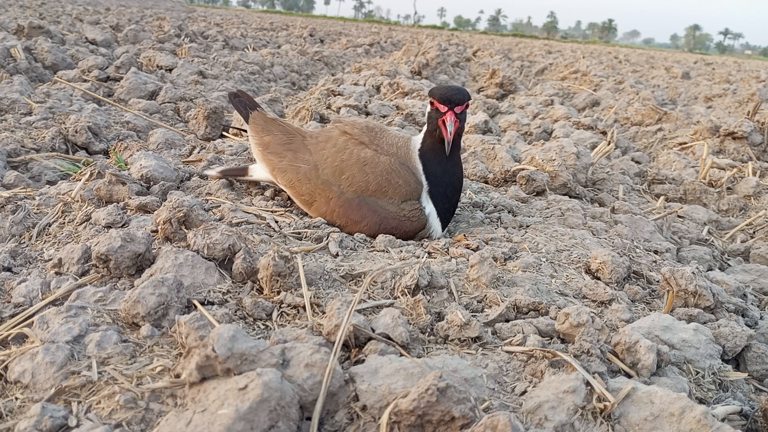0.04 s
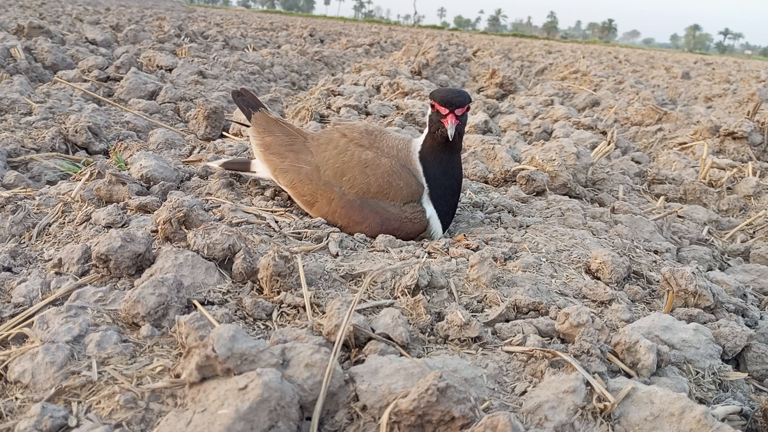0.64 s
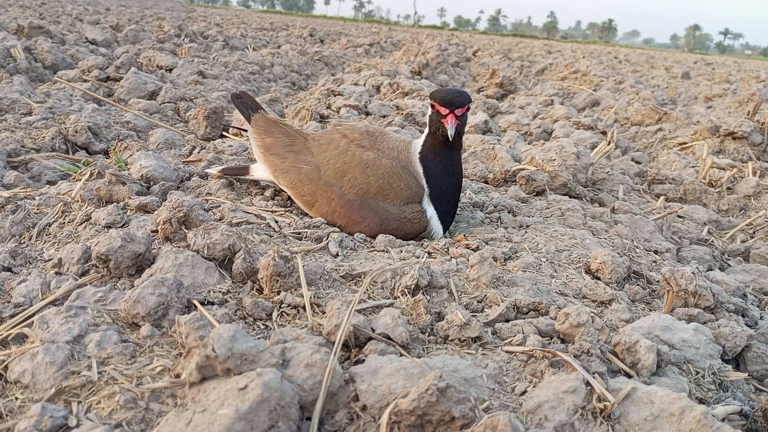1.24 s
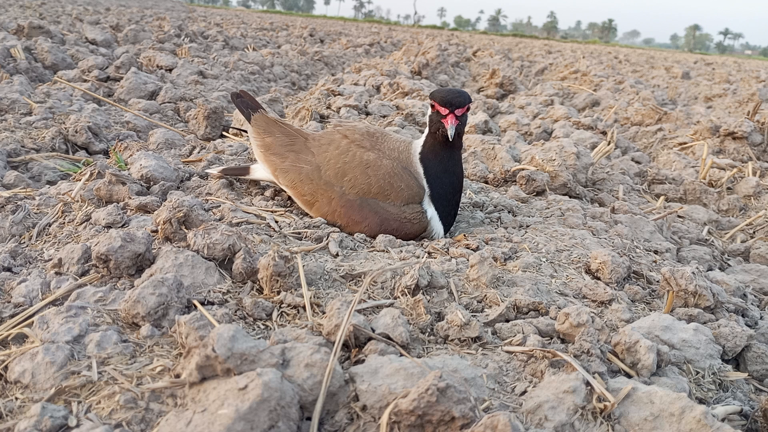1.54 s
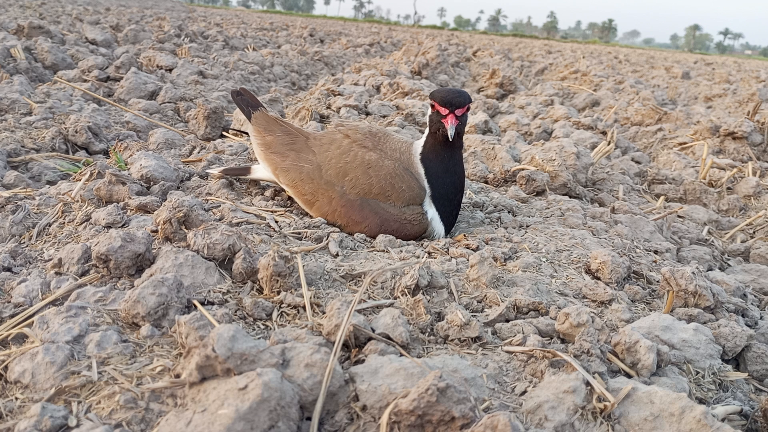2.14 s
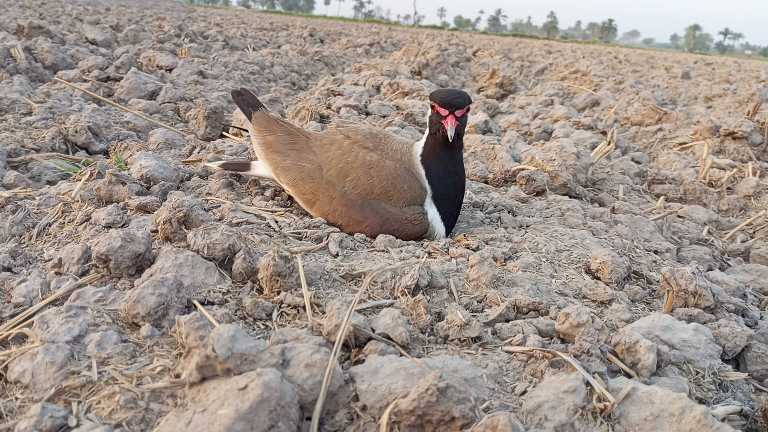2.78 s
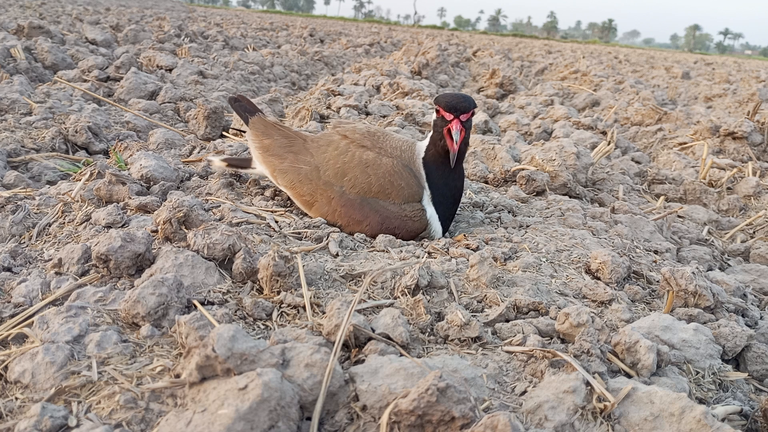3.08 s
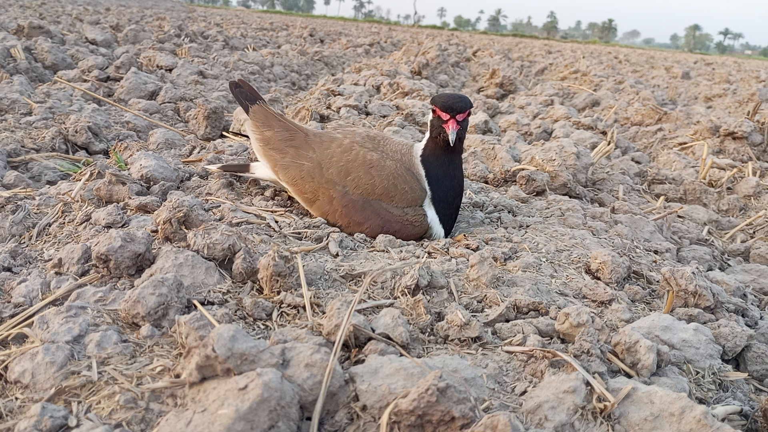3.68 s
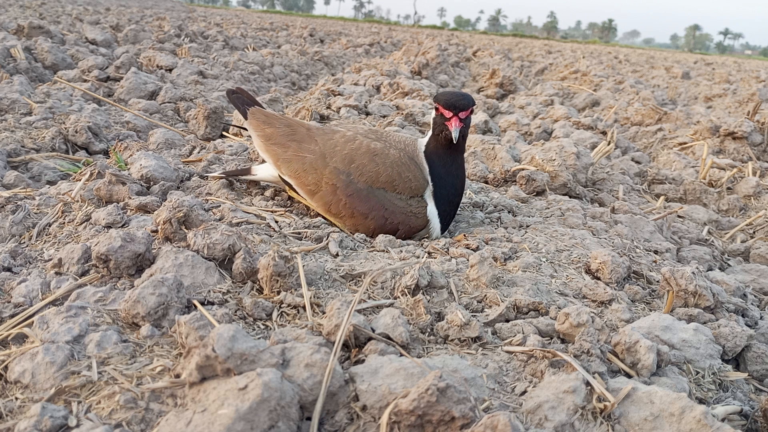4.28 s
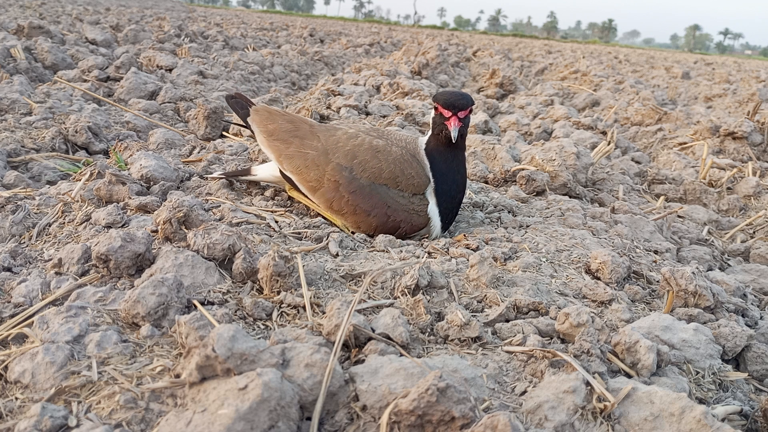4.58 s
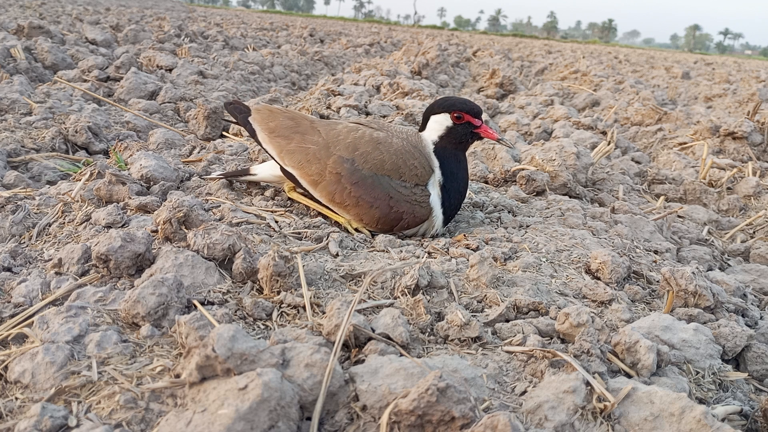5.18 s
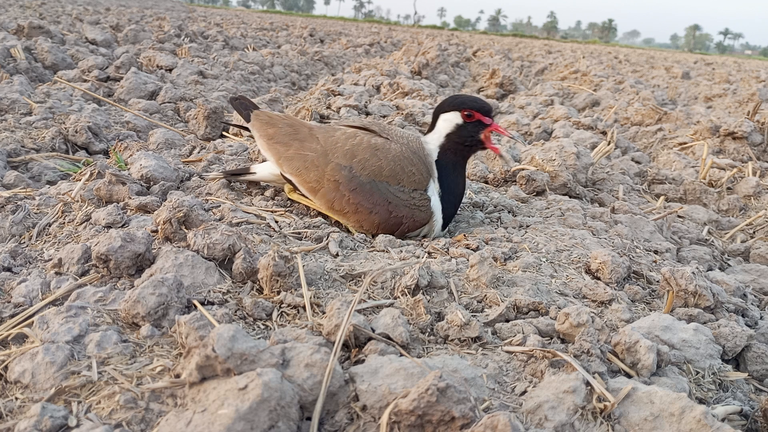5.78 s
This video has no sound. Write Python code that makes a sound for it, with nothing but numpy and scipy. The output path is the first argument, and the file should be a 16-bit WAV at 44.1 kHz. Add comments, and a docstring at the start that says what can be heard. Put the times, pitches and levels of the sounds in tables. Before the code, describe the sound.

A lapwing gives three quick rattling notes, then three sharp, loud calls, over faint wind and distant twittering birds.

```python
"""In a ploughed field, a lapwing on its nest gives three rattling notes, then three sharp calls.
Its voice is a pair of buzzing membranes, shaped by throat and bill. A valve chops it into rattles;
in each sharp call it flutters, breaks up and leaps higher. Small birds twitter far off over
light wind. An automatic gain control turns the whole field down at each loud call."""
import sys
import numpy as np
from scipy import signal
from scipy.fft import rfft, irfft
from scipy.io import wavfile
from scipy.ndimage import uniform_filter1d, minimum_filter1d

SR = 44100
rng = np.random.default_rng(int(sys.argv[2]) if len(sys.argv) > 2 else 0)


def materialize(psi):
    """Save the field psi as 16-bit PCM at rate SR to the path in sys.argv[1].

    A 1-D psi becomes a single channel; in a 2-D psi each row is a channel.
    """
    bounded = np.clip(np.atleast_2d(psi).T, -1, 1)
    quanta = np.round(bounded * 32767).astype(np.int16)
    wavfile.write(sys.argv[1], SR, quanta)


N = 261494
TIME = np.arange(N) / SR


def from_db(db):
    """Turn decibels into a gain."""
    return 10 ** (np.asarray(db) / 20)


def rms_one(x):
    """Scale a signal to an average power of 1."""
    return x / np.sqrt(np.mean(x ** 2) + 1e-20)


def gain_at(points, hz):
    """Read gains off a curve of (f/Hz, level/dB) points."""
    point_hz, level_db = np.transpose(points)
    return from_db(np.interp(np.log(hz + 1), np.log(point_hz), level_db))


def wobble(rate_hz, size=N):
    """A smooth random wander of about +-1, no faster than roughly rate_hz."""
    hz = np.arange(size // 2 + 1) * SR / size
    return rms_one(irfft(rfft(rng.standard_normal(size)) / (1 + (hz / rate_hz) ** 4), size))


def coloured_noise(spectrum):
    """Noise with the given balance of low and high."""
    hz = np.arange(N // 2 + 1) * SR / N
    return rms_one(irfft(rfft(rng.standard_normal(N)) * gain_at(spectrum, hz), N))


def gate(t, length, attack, release):
    """Opens at t = 0 and closes around t = length."""
    return np.clip(t / attack, 0, 1) * (1 - np.tanh((t - length) / release)) / 2


def after(t, fade=.001):
    """A smooth switch from 0 to 1 at t = 0."""
    return (1 + np.tanh(t / fade)) / 2


def dying(t, decay_s):
    """Stays at 1 until t = 0, then dies away."""
    return np.exp(-np.maximum(t, 0) / decay_s)


# Gusts: peak t/s, half width/s, level/dB
WIND_GUSTS = [(.66, .18, -57), (1.03, .22, -54), (3.199, .3, -55.5), (4.05, .13, -65), (5.15, .65, -62.5)]
# Tone of the wind's low rumble: f/Hz, level/dB
RUMBLE_TONE = [(15, -51), (30, -19.5), (55, -7.5), (85, 1), (120, -0.5), (155, -0.5), (250, -8), (330, -8),
               (520, -23), (700, -26), (1200, -59.5)]
# Tone of a gust's own rush: f/Hz, level/dB
GUST_TONE = [(40, -20), (100, -5), (155, 0), (230, -4), (330, -7.5), (520, -24), (1200, -56)]
# Tone of the soft hiss over the field: f/Hz, level/dB
HISS_TONE = [(240, -34), (400, -3.5), (636, -9.5), (964, -7.5), (1060, -11), (1840, -10.5), (2050, -13.5),
             (2800, -10.5), (3580, -12.5), (5030, -13.5), (7280, -29), (16000, -43)]

def wind(calm_db=-63.5, hiss_db=-65):
    """Wind rumbles on the microphone and gusts buffet it, over a soft hiss; the background is quieter in the
    first half second."""
    gust = sum(from_db(db) * np.exp(-((TIME - peak) / width) ** 2) for peak, width, db in WIND_GUSTS)
    rumble = (from_db(calm_db) + from_db(-9) * gust) * coloured_noise(RUMBLE_TONE)
    rumble += gust * coloured_noise(GUST_TONE)
    hiss_gain = from_db(hiss_db - 6 * dying(TIME, .46) + wobble(5))
    return from_db(2 * wobble(14)) * rumble + hiss_gain * coloured_noise(HISS_TONE)


def voice_box(pitch, dull_db, rough, third_boost=0):
    """Membranes buzz; roughness shakes the timing and strength of their pulses and lets air hiss by."""
    size = len(pitch)
    phase = 2 * np.pi * np.cumsum(pitch * (1 + .077 * rough * wobble(700, size))) / SR
    harmonic = np.arange(1, 14)[:, None]
    # slack membranes lose their upper harmonics
    slack_db = -dull_db * np.clip(harmonic - 2, 0, 4)
    # the boost turns the third harmonic up and the rest down
    boost_db = third_boost * np.where(harmonic == 3, .25, -1)
    strength = from_db(slack_db + boost_db) * (harmonic * pitch < SR / 2)
    pulses = np.sum(strength * np.cos(harmonic * phase), axis=0)
    pulses *= 1 + .18 * rough * wobble(790, size)
    air = .42 * rough * (1 + np.cos(phase)) * rng.standard_normal(size)
    return pulses + air * from_db(-2 * dull_db)


TIRED_S = .147   # a rattling note cracks at this age

def rattle_voice(age, left, steady_hz=1252.6, yelp_hz=1570, yelp_s=.1645):
    """A note starts flat and sags at its end; a long one also tires, cracks and leaps to a yelp."""
    scoop, droop = dying(age, .013), dying(left, .0044)
    tired = np.clip(age / TIRED_S, 0, 1.04)
    cracked, yelp = after(age - TIRED_S, .004), after(age - yelp_s)
    low_hz = steady_hz * (1 - .075 * scoop) * (1 - .15 * tired ** 3.5)
    high_hz = yelp_hz * (1 - .075 * dying(age - yelp_s, .006))
    pitch = ((1 - yelp) * low_hz + yelp * high_hz) * (1 - .05 * droop)
    dull_db = (1 - yelp) * (.52 + scoop + 7 * tired ** 2 + 1.5 * droop) + 6.3 * yelp
    rough = (1 - yelp) * (.025 + .16 * scoop + .55 * cracked) + .13 * yelp
    effort_db = (1 - yelp) * tired ** 2 - 5 * yelp
    return pitch, dull_db, rough, effort_db


def valve_pulses(onset, rattles, held, ends, spacing, change, shut_s=.0043):
    """Valve openings (t/s, length/s, level/dB); the gaps between them close as the bird tires."""
    starts = rattles + np.cumsum(np.r_[0, spacing + change * np.arange(12)])
    starts = np.r_[starts[starts < held - spacing / 2], held]
    gaps = shut_s * np.clip(1 - 1.3 * ((starts[1:] - onset) / TIRED_S) ** 3, 0, 1)
    pulses = [(start, length, 0) for start, length in zip(starts, np.diff(starts) - gaps)]
    leak, tick = (onset - .004, .004, -35), (onset, .0048, -7)
    return [leak, tick, *pulses, (held, ends - held, 0)]


# Rattling notes: start t/s, rattle t/s, hold t/s, end t/s, pulse spacing/s, its change/s, level/dB
RATTLES = [(.0413, .0538, .068, .096, .0142, 0, -1), (.1695, .1803, .2251, .248, .0142, .0008, -.5),
           (.3284, .3381, .4437, .510, .0145, -.00036, 0)]

def rattling_notes(attack_s=.0008, release_s=.0011, leak_db=-24):
    """A valve chops the voice into pulses, then stays open; returns the voice and its airflow."""
    voice, airflow = np.zeros(N), np.zeros(N)
    for onset, rattles, held, ends, spacing, change, note_db in RATTLES:
        span = slice(int((onset - .02) * SR), int((ends + .02) * SR))
        t = TIME[span]
        pitch, dull_db, rough, effort_db = rattle_voice(t - onset, ends - t)
        opening, pressure = 0, 0
        for start, length, level_db in valve_pulses(onset, rattles, held, ends, spacing, change):
            pulse = gate(t - start, length - release_s, attack_s, release_s)
            leak = from_db(leak_db) * gate(t - start + .0025, length + .005, .0014, .002)
            opening += from_db(level_db) * (pulse + leak)
            pressure += pulse * np.exp(-np.abs(t - start) / .003)
        slack_db = 3 * np.clip(1 - opening, 0, 1)
        envelope = opening * from_db(note_db + effort_db)
        # pent-up air lifts and roughens the start of each pulse
        buzz = voice_box(pitch * (1 + .014 * pressure), dull_db + slack_db, rough + .3 * pressure)
        voice[span] += envelope * buzz
        # a slack voice pushes less air
        airflow[span] += envelope * (rough + .44 * pressure) * from_db(-.51 * dull_db)
    return voice, airflow


# How throat and open bill colour the voice: f/Hz, level/dB
THROAT_TONE = [(200, -38), (850, -30), (1220, -18), (1430, -10), (1800, -11), (2250, 0.5), (2480, -3.5),
               (2800, 1.5), (3100, -2.5), (3480, -4.5), (3750, -7.5), (4200, -4), (5100, -1), (5600, -7),
               (6250, 0.5), (7000, -5.5), (7550, -15.5), (8300, -21.5), (9000, -26), (11200, -27),
               (13200, -43.5), (16000, -40)]

def throat(source, size=2048):
    """Throat and bill ring after each pulse of the voice."""
    hz = np.arange(size // 2 + 1) * SR / size
    cepstrum = irfft(np.log(gain_at(THROAT_TONE, hz)))
    # fold it so the ringing never comes before the pulse (minimum phase)
    cepstrum[1:size // 2] *= 2
    cepstrum[size // 2 + 1:] = 0
    ringing = irfft(np.exp(rfft(cepstrum)))
    return signal.fftconvolve(source, ringing)[:N]


# Tone of the breath: f/Hz, level/dB
BREATH_TONE = [(100, -21.5), (300, -6), (550, -0.5), (900, 0.5), (1800, 4), (3500, 0.5), (7000, -4),
               (11000, -11.5), (16000, -22)]

def breath(rattle_air, sharp_air):
    """Air rushes through the open bill, slower and duller in the rattles."""
    air = coloured_noise(BREATH_TONE)
    slow_air = signal.sosfilt(signal.butter(2, 7500, fs=SR, output="sos"), air)
    return from_db(-17) * rattle_air * slow_air + from_db(-19) * sharp_air * air


def echoes(x, fade_s, level_db):
    """Many small reflections blur into a tail that drops 60 dB in fade_s."""
    t = TIME[:SR]
    tail = rng.standard_normal(SR) * from_db(-60 * t / fade_s) * (t > .002)
    return from_db(level_db) * signal.fftconvolve(x, tail / np.linalg.norm(tail))[:N]


def whistle(length, start_hz, middle_hz, end_hz, level_db, buzz, buzz_hz=95):
    """An almost pure tone glides through three pitches; buzz shakes its pitch and level."""
    progress = np.linspace(0, 1, int(max(length, .01) * SR))
    glide = np.polyval(np.polyfit([0, .5, 1], [start_hz, middle_hz, end_hz], 2), progress)
    trill = np.sin(2 * np.pi * buzz_hz * length * progress)
    pitch = glide * (1 + buzz * (.04 * trill + .13 * buzz * wobble(300, len(progress))))
    loudness = from_db(level_db + 8 * buzz * trill + 1.1 * wobble(70, len(progress)))
    swell = np.sin(np.pi * progress) * loudness
    return np.sqrt(2) * swell * np.sin(2 * np.pi * np.cumsum(pitch) / SR)


# Arched chirps: top t/s, fall length/s, top f/Hz, level/dB
BIRD_CHIRPS = [(.707, .066, 4800, -52.5), (3.451, .051, 4750, -47.5), (3.778, .047, 4700, -50),
               (5.405, .076, 5000, -57.5)]
# Whistles: t/s, length/s, start f/Hz, middle f/Hz, end f/Hz, level/dB, buzz/0-1
BIRD_WHISTLES = [(1.71, .04, 3320, 3260, 3150, -62, .1), (1.931, 0.039, 2610, 2392, 2250, -61, .1),
                 (2.089, 0.2, 2400, 2506, 2410, -59, 0.2), (2.3, 0.16, 3590, 3040, 2840, -59.5, 0.94),
                 (2.44, .1, 2350, 1946, 1900, -65, .2), (2.526, .055, 1978, 2160, 2200, -59.5, .05),
                 (2.584, .07, 3400, 3220, 2900, -62, .6), (3.29, .15, 2755, 2795, 2740, -63.5, 0.35),
                 (3.35, 0.073, 3390, 3230, 3040, -63, .05), (3.82, 0.026, 3760, 3380, 2580, -55.5, .05),
                 (4.033, 0.041, 2540, 2450, 2194, -63.5, .05), (4.45, .17, 2500, 2285, 1957, -64, 0.52),
                 (4.61, 0.073, 1944, 2077, 2210, -59, .1), (4.682, 0.27, 4960, 5880, 5520, -63, 0.5),
                 (5.06, .12, 3300, 3210, 2810, -63.5, .9), (5.26, 0.056, 3520, 3210, 3000, -61.5, .05),
                 (5.631, .11, 1040, 1230, 1080, -66.5, 0.1)]
# A run of pips: first t/s, spacing/s, start f/Hz, end f/Hz, level/dB
BIRD_PIPS = (2.458, .0705, 3000, 2770, -64)

def small_birds(rise_s=.046, twitter_db=-69.5, twitter_count=230):
    """Small birds chirp, whistle and pip over a random twitter from farther off."""
    first, spacing, from_hz, to_hz, pip_db = BIRD_PIPS
    pip = (.04, from_hz, (from_hz + to_hz) / 2, to_hz, pip_db, .05)
    notes = BIRD_WHISTLES + [(first + k * spacing, *pip) for k in range(9)]
    for top, fall_s, hz, level_db in BIRD_CHIRPS:   # a soft rise, then a loud fall
        notes.append((top - rise_s, 1.4 * rise_s, .81 * hz, hz, 1.1 * hz, level_db - 16, .1))
        notes.append((top, fall_s, hz, .875 * hz, .645 * hz, level_db, .05))
    for when, long, high, loud, steep in rng.random((twitter_count, 5)):
        hz, fall = 2600 + 4000 * high, .3 * steep
        pitches = hz, hz * (1 - .38 * fall), hz * (1 - fall)
        level_db = twitter_db + 10 * (loud ** 2 - .5) - 8 * high
        notes.append((when * N / SR, .03 + .063 * long, *pitches, level_db, .05))
    out = np.zeros(N + SR)
    for start, *note in notes:
        sound, at = whistle(*note), int(start * SR)
        out[at:at + len(sound)] += sound
    return out[:N]


def sharp_voice(t, onset, breaks, leaps, ends, flutter, upper_ratio=1.365):
    """The voice climbs, breaks into hops, leaps to its high register and flicks down at the end."""
    climb = np.clip((t - onset) / (breaks - onset), 0, 1)
    strain = np.clip((t - breaks) / (leaps - breaks), 0, 1)
    broken, upper = after(t - breaks, .0023), after(t - leaps)
    lower, flick = 1 - upper, dying(ends - t, .0045)
    settling = 1 - after(t - leaps - .011, .002)   # husky and flat just after the leap
    depth = lower * ((1 - broken) * .024 * climb + broken * .04)
    # each crest of the flutter reaches further toward the high register
    hop = upper + lower * broken * np.clip((.45 + 1.05 * strain) * flutter, 0, 1)
    low_ratio = (1 + .105 * climb + .01 * strain) * (1 + depth * flutter)
    ratio = (1 - hop) * low_ratio + hop * upper_ratio * (1 - .018 * settling - .075 * flick)
    level_db = 4 * upper - 2.5 * dying(t - onset, .01) - 8 * dying(ends - t, .007)
    low_rough = (1 - broken) * (.13 + .15 * climb ** 2) + .62 * broken
    rough = lower * low_rough + upper * (.045 + .35 * settling)
    # on upward hops and just after the leap, the third harmonic whistles above the rest
    third_boost = 9.5 * hop ** 2 * settling
    slack_db = .1 * lower * climb + 3 * flick
    return ratio, level_db, depth, rough, third_boost, slack_db


# Sharp calls: start t/s, break t/s, leap t/s, end t/s, start f/Hz, level/dB,
# level change by the end/dB, dullness/dB per harmonic
CALLS = [(3.113, 3.1498, 3.172, 3.2048, 1281, 1.5, 5, 0.5),
         (4.1566, 4.1942, 4.218, 4.2507, 1284, 1.5, 4.5, 0.88),
         (5.8259, 5.8587, 5.8972, 5.9226, 1325, 6.5, -4.5, 1.87)]

def sharp_calls(flutter_hz=152, catch_db=-36):
    """The voice flutters between two registers until it holds the upper; returns voice and airflow."""
    voice, airflow = np.zeros(N), np.zeros(N)
    for onset, breaks, leaps, ends, pitch_hz, call_db, change_db, dull_db in CALLS:
        span = slice(int((onset - .02) * SR), int((ends + .02) * SR))
        t = TIME[span]
        # the flutter is a little uneven; the voice breaks on a crest of it
        turns = np.cumsum(flutter_hz * (1 + .065 * wobble(130, len(t)))) / SR
        flutter = np.cos(2 * np.pi * (turns - np.interp(breaks, t, turns)))
        course = sharp_voice(t, onset, breaks, leaps, ends, flutter)
        ratio, level_db, depth, rough, third_boost, slack_db = course
        throb = np.tanh(depth / .018) * flutter
        # a faint catch in the throat comes just before the call
        catch = from_db(catch_db) * gate(t - onset + .012, .0024, .00063, .0017)
        effort_db = call_db + level_db + change_db * np.clip((t - onset) / (ends - onset), 0, 1)
        envelope = from_db(effort_db) * (gate(t - onset, ends - onset - .001, .00048, .0015) + catch)
        dullness_db = dull_db + slack_db - 2 * throb + 8 * (t < onset)
        buzz = voice_box(pitch_hz * ratio, dullness_db, rough, third_boost)
        voice[span] += envelope * (1 + .15 * throb) * buzz
        airflow[span] += envelope * rough * from_db(-3 * dull_db)
    return voice, airflow


# Tone of the thrum: f/Hz, level/dB
THRUM_TONE = [(40, -30), (100, -9), (150, 5), (200, -10), (280, -10), (450, -20), (1500, -45.5)]

def thrum(airflow):
    """A low thrum under the flutter follows the airflow."""
    return from_db(-29) * airflow * coloured_noise(THRUM_TONE)


def scene():
    """The lapwing close by, echoing off the clods and the far field, among small birds and wind."""
    rattle, rattle_air = rattling_notes()
    sharp, sharp_air = sharp_calls()
    voice = -throat(from_db(-1) * (rattle + sharp))
    lapwing = voice + breath(rattle_air, sharp_air) + thrum(sharp_air)
    clods = echoes(lapwing, fade_s=.045, level_db=-34.5)
    far_field = echoes(lapwing, fade_s=.5, level_db=-63)
    birds = small_birds()
    bird_echoes = echoes(birds, fade_s=.26, level_db=-11)
    return (lapwing + clods + far_field + birds + bird_echoes + wind())[None]


def record(dry, threshold_db=-17, squeeze=.8, release_db_per_s=120, cutoff_hz=15900):
    """Gain control turns loud moments down at once and eases back up; the highest treble is cut."""
    level_db = 10 * np.log10(np.abs(uniform_filter1d(dry[0] ** 2, size=256)) + 1e-12)
    over_db = squeeze * np.maximum(level_db - threshold_db, 0)
    recovery_db = release_db_per_s * TIME
    held_db = np.maximum.accumulate(over_db + recovery_db) - recovery_db
    gain_db = uniform_filter1d(minimum_filter1d(-held_db, size=320), size=256)
    top_cut = signal.ellip(10, .1, 80, cutoff_hz, fs=SR, output="sos")
    return signal.sosfilt(top_cut, dry * from_db(gain_db))


dry = scene()
out = record(dry)
materialize(out)
```